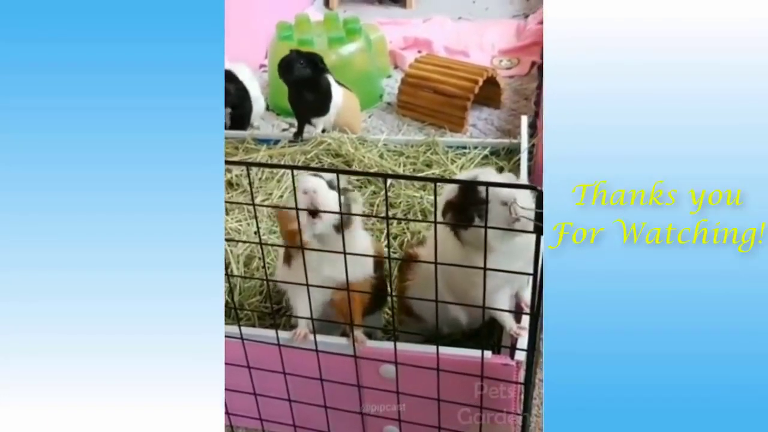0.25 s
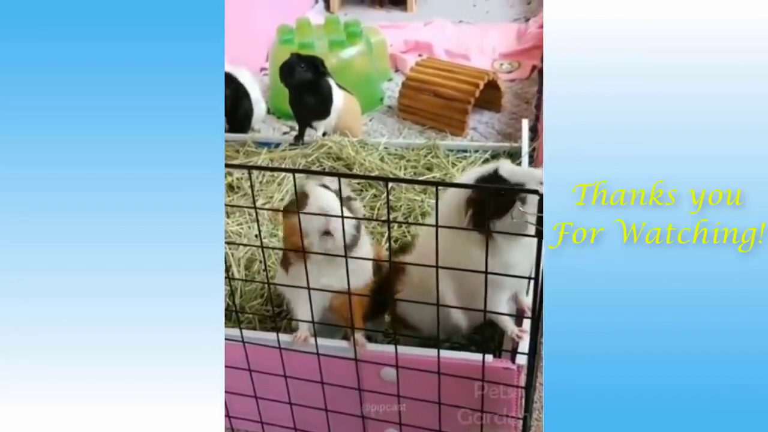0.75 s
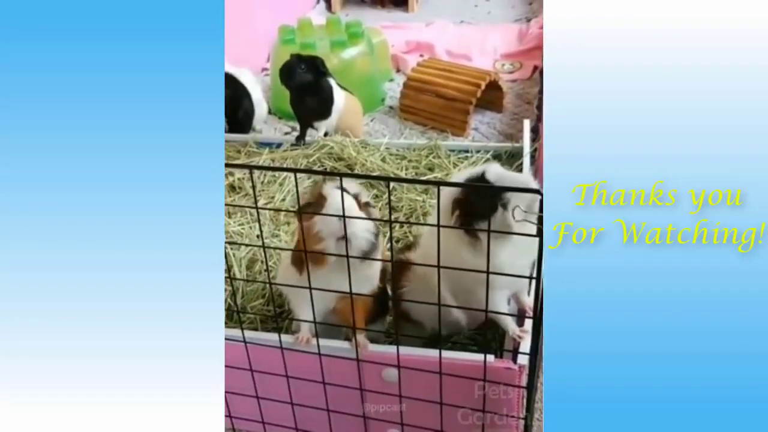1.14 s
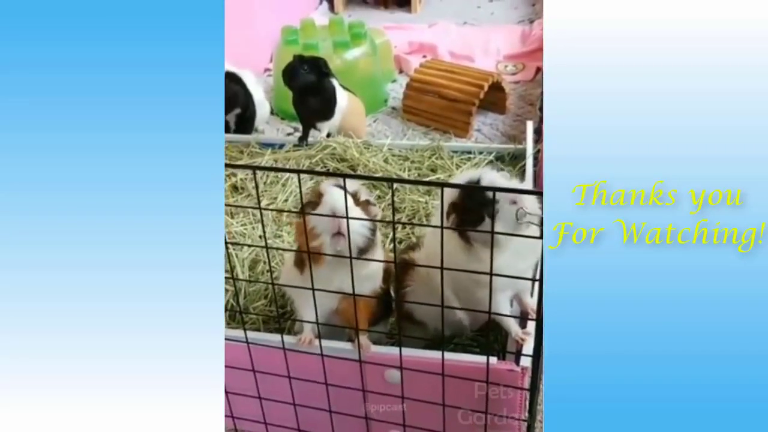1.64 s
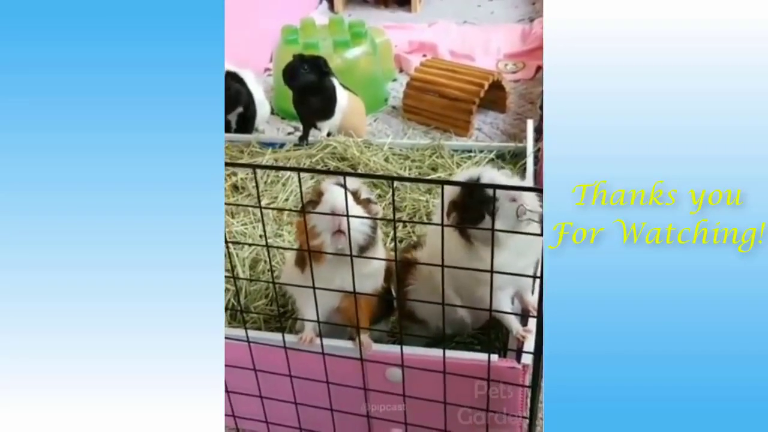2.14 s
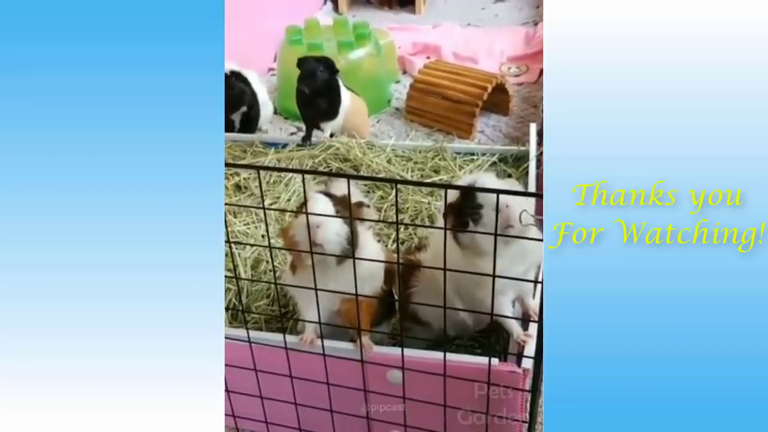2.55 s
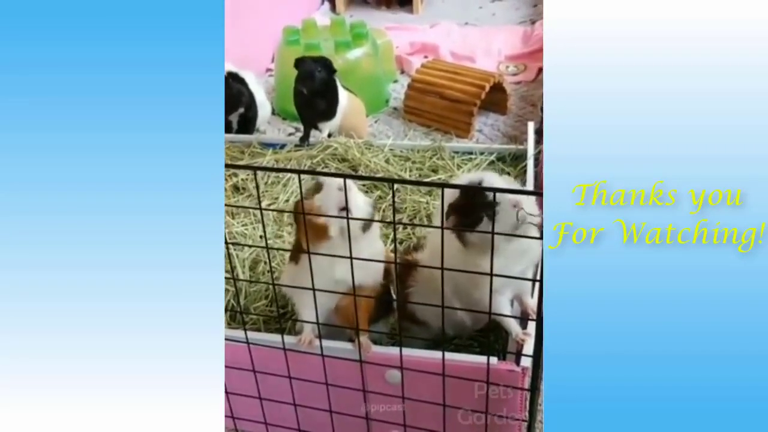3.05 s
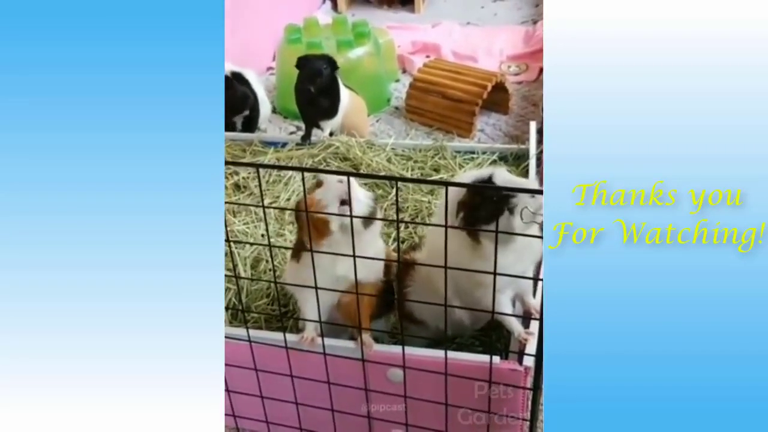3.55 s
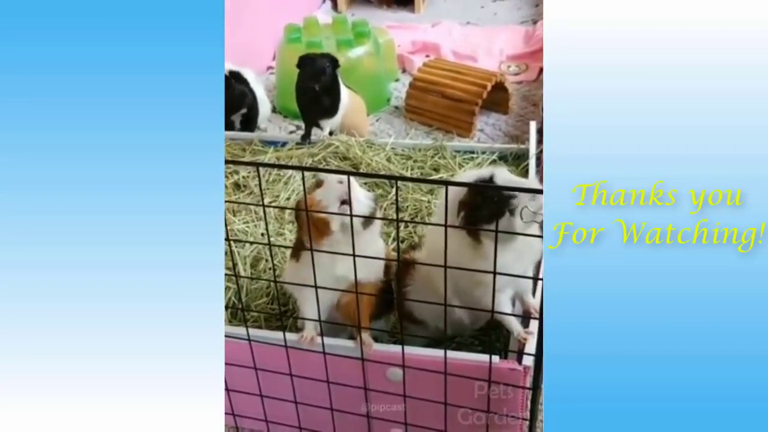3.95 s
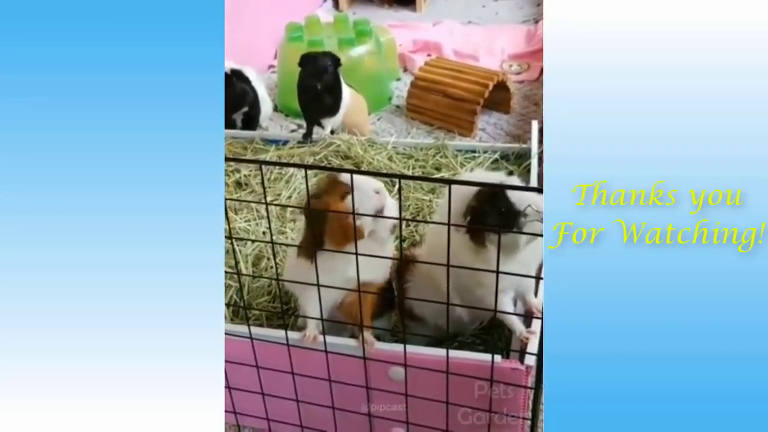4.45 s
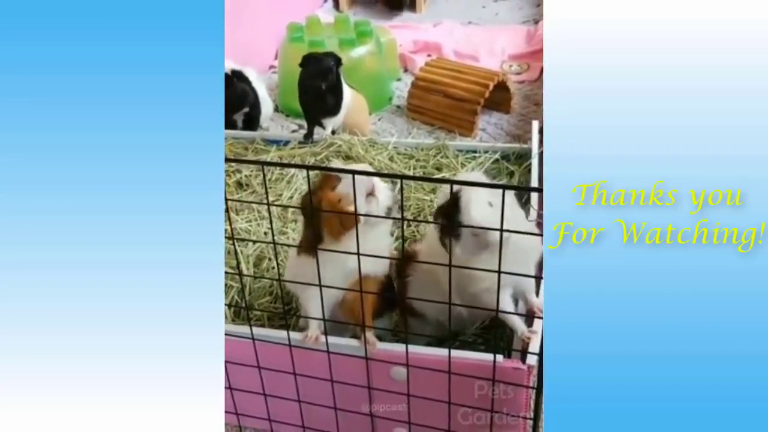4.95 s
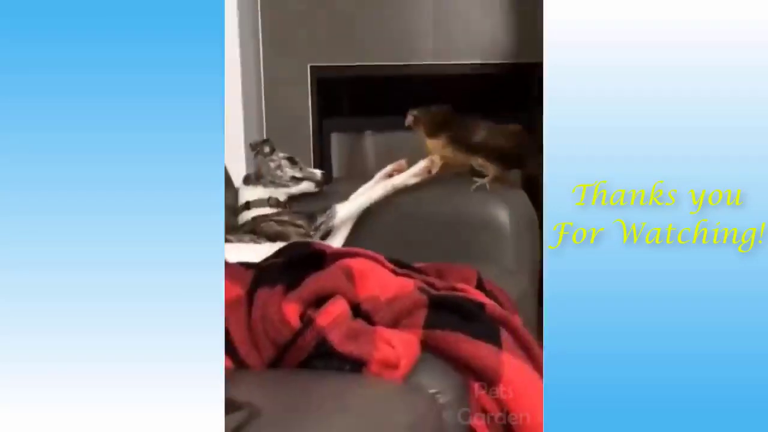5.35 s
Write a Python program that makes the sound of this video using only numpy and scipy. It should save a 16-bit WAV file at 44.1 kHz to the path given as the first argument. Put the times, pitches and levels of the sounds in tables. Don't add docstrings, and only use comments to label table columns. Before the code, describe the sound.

In a small room, paws thump a hollow plastic tray and a nearby guinea pig gives a long, loud rising squeal that cracks at its end. A shorter, quieter squeal follows, then soft upward chirps and peeps from the others. Around three seconds another long squeal climbs and roughens, with a strong tray knock near its end. Chirps continue until an abrupt stop; close microphone, low rumble and faint hay rustle.

```python
import sys
import numpy as np
from scipy import signal
from scipy.fft import rfft, irfft, next_fast_len
from scipy.io import wavfile
from scipy.ndimage import uniform_filter1d

SR = 44100
rng = np.random.default_rng(int(sys.argv[2]) if len(sys.argv) > 2 else 0)


def put_to_file(sound):
    columns = np.atleast_2d(sound).T
    safe = np.clip(columns, -1, 1)
    whole_steps = np.round(safe * 32767)
    wavfile.write(sys.argv[1], SR, whole_steps.astype(np.int16))


def rack_gain(trim_db):
    fader = np.asarray(trim_db, float)
    return 10 ** (fader / 20)


N = 246519
END_S, CUTOFF_HZ = 5.326, 14300

# [level_hz, level_db_per_hz]
RUMBLE_SPECTRUM = [(15, -55.5), (26, -21), (41, -3), (59, 14), (118, -0.5), (151, -6), (178, -20),
                   (230, -10.5), (300, -14), (390, -42), (660, -120)]
MURMUR_SPECTRUM = [(88, -48.5), (150, -2), (311, -2), (418, -10.5), (554, -8), (653, -7), (930, -5.5),
                   (1290, -8), (1600, -22), (2500, -27), (3250, -55.5), (5500, -120)]
RUSTLE_SPECTRUM = [(880, -25.5), (1500, -2.5), (1970, -7), (2360, -6), (2720, -10), (3890, -7.5),
                   (5570, -11), (7180, -12), (8200, -9), (9990, -18.5), (12300, -10.5), (13600, -9),
                   (14300, -30)]
# [time_s, level_db]
RUSTLE_LEVEL = [(0.0, -57), (0.34, -58), (0.48, -55), (0.67, -60.5), (1.04, -64), (1.38, -67), (1.57, -66.5),
                (1.98, -62), (2.52, -65), (3.07, -65.5), (3.51, -57), (3.72, -55.5), (4.0, -60), (4.08, -69.5),
                (4.3, -63.5), (4.58, -61), (4.86, -66), (5.12, -69.5)]
# [centre_s, length_s, over_rumble_db]
BOOMS = [
    (.02, 0.14, 8),
    (.45, 0.069, 16.5),
    (.7, 0.052, 8.5),
    (1.38, 0.23, 2.5),
    (1.95, .1, 4),
    (3.0, 0.086, 4.5),
    (3.5, 0.29, 9),
    (4.1, 0.3, 3),
    (4.6, 0.19, 6),
    (4.95, 0.14, 7),
]
MURMUR_DB, MURMUR_FOLLOWS = -53, .35
RUMBLE_DB, RUMBLE_FOLLOWS = -49, 0.1

# [start_s, peak_db, second_contact_db re the first, before level offsets]
KNOCKS = [(0.004, -16.5, 7), (0.211, -16.5, 3.5), (0.415, -19.5, 9), (0.634, -29.5, 8), (1.646, -27, 4.5),
          (1.883, -19.5, -1.5), (2.087, -33.5, 7), (2.306, -27.5, -4.5), (2.514, -23.5, 0),
          (2.715, -24.5, 0.5), (3.294, -34.5, -3), (3.649, -8, -4.5), (3.871, -17, 5.5)]
# [mode_hz, level_db, t60_s]
TRAY_MODES = [(246.8, -3.5, 0.079), (328.5, -0.5, 0.11), (416.6, 1, 0.05), (530, -0.5, .03),
              (672, -7.5, 0.062), (728, -0.5, .035), (900, -20.5, 0.021), (1150, -9, 0.03),
              (1500, -11, 0.024)]

# [start_s, length_s, from_hz, to_hz,
# level_db]
THIN_GLIDES = [(1.749, 0.083, 1420, 1740, -57.5), (1.844, 0.039, 2462, 2170, -48),
               (1.885, 0.04, 2275, 2550, -49.5), (2.449, 0.072, 717, 1604, -56.5), (2.778, 0.049, 833, 1440, -53),
               (2.82, 0.04, 1425, 1760, -65), (3.935, 0.0495, 1055, 1334, -48.5), (3.981, 0.039, 1880, 4670, -57),
               (4.738, 0.053, 1104, 1880, -58), (5.012, 0.035, 1370, 1310, -50.5),
               (5.275, 0.036, 912, 1082, -44.5),
               (.004, 0.095, 2770, 2785, -53), (0.09, 0.047, 2760, 3000, -51.5), (0.545, 0.08, 988, 1106, -56),
            (.8, 0.086, 4401, 4568, -57), (.8, .06, 1353, 1895, -58), (1.028, 0.058, 575, 535, -56.5),
            (1.2, .04, 2320, 2580, -55), (2.477, 0.028, 1910, 2700, -65), (2.635, 0.027, 2150, 2570, -62.5),
            (2.78, .025, 2040, 2800, -65), (3.562, .06, 892, 1380, -55.5), (3.75, 0.028, 3500, 3510, -62),
            (4.273, .08, 1150, 1950, -54), (4.72, 0.025, 1120, 1005, -53), (4.99, .03, 1077, 1120, -73)]
# [time_s, pitch_hz, level_db]
LONG_WHISTLE = [(1.24, 2279, -54), (1.3, 2500, -55), (1.312, 2605, -50), (1.37, 2920, -56),
                (1.419, 2945, -52), (1.492, 3395, -57), (1.505, 3877, -80), (1.529, 3970, -51.5),
                (1.545, 4033, -87)]
WARBLE = [
    (4.047, 656, -48),
    (4.078, 1136, -52.5),
    (4.12, 1487, -58),
    (4.153, 1147, -54),
    (4.166, 1095, -57),
    (4.243, 1193, -54),
]
WARBLE_OCTAVE_DB = -11
GLIDE_BEND, GLIDE_EDGE_DB, GLIDE_OCTAVE_DB = .55, -1.5, -21

# [time_s, pitch_hz before breaks, effort_db, fold_pressing_db, mouth_opening_db]
FIRST_SQUEAL = [(.025, 769, -39, -12, -26.5), (.056, 1231, -35.5, -20, -21), (.17, 1342, -39.5, -9, -6),
                (.305, 1659, -36, -8.5, -0.5), (.355, 2030, -27.5, -10.5, -9.5),
                (.448, 2351, -18, -12.5, -8), (.486, 2592, -16.5, -2.5, 0.5), (.578, 3048, -22.5, -5, 8),
                (.661, 3170, -20.5, -4, -8)]
SECOND_SQUEAL = [(.81, 608, -58, 0, -3.5), (.85, 547, -48.5, 3, -15), (.93, 995, -38, -13, -28),
                 (.97, 1052, -39.5, -21, -14.5), (1.004, 1224, -43, -4.5, -4), (1.068, 1247, -45, 2, -4),
                 (1.124, 1387, -38, -0.5, -3), (1.176, 1658, -36.5, -6.5, -1.5),
                 (1.212, 1726, -35, -16.5, -24)]
THIRD_SQUEAL = [(3.075, 560, -49, -5.5, -20.5), (3.145, 1053, -31, -34.5, -52),
                (3.27, 1272, -34.5, -18, -14), (3.345, 1655, -35.5, -13, -7.5),
                (3.406, 2003, -28, -15, -14.5), (3.49, 2276, -24.5, -12.5, -23),
                (3.53, 2397, -17, -10.5, -24.5), (3.712, 3212, -23, -15.5, -23.5),
                (3.745, 3190, -37, -14, -25)]
# [time_s, pitch_hz, harmonic_1_db, harmonic_2_db, harmonic_3_db]
FLICK = [
    (.664, 4100, -32, -30, -40),
    (.667, 4550, -28, -28, -34),
    (.67, 4700, -36, -36, -42),
]
# [time_s, jump_hz]
BREAKS = [
    (0.448, 219.5),
    (0.488, 169.3),
    (1.188, 213),
    (3.503, 301),
    (3.72, 331),
]
BREAK_S = 0.0052
# [overtone_hz, level_db]
THROAT = [(2000, -6), (3500, -40), (4500, -3), (5400, -31), (6300, 1.5), (7200, -11), (8300, -5),
          (9300, -17), (10300, -26), (11500, -22), (12500, -18.5), (13400, -2), (13900, 2), (14050, -49)]
SOFT_THROAT = [(1200, 3), (2000, -6), (2800, 4), (4500, 1)]
# [harmonic_hz, level_db]
MOUTH = [(600, -4), (1400, -7), (2350, 2.86), (3150, -13.5), (3550, -7), (4500, -8.5), (6200, 5),
         (10000, -5.2)]
THIRD_DB, THIRD_PRESS, THIRD_OPEN = -7, 0.71, 0.34
HALF_S, HALF_LENGTH_S, HALF_DB, HALF_HIGH_DB = 3.6, .075, -50, -41

# [rise_start_s, rise_s, top_hz, hold_s, level_db]
HOOKED_CHIRPS = [(1.104, 0.029, 852, 0.0044, -55), (1.369, 0.058, 1048, 0.0063, -44),
                 (1.643, 0.053, 1005, 0.16, -44.5), (4.634, .065, 1175, 0.0024, -41.5),
                 (4.888, .088, 1055, 0.0071, -40), (5.194, .038, 870, 0.045, -41.5)]
# [start_s, rise_s, top_hz, hold_s, level_db]
PLAIN_CHIRPS = [(1.812, 0.031, 1036, 0.0027, -53), (2.117, 0.03, 939, 0.2, -47),
                (2.578, 0.052, 1042, 0.011, -45.5), (2.837, 0.041, 905, .005, -50.5),
                (3.967, .046, 1720, 0.0025, -46), (4.249, 0.04, 891, 0.17, -41)]
LOW_HZ, DIP_FROM_HZ, DIP_S, REST_S = 628.3, 820, .025, .03
# [start_db, bottom_db]
DIP_DB = (-4.5, -10)
CLIMB_HZ_PER_S, FLICK_S = 1100, 0.024
START_DB, TOP_DB, HELD_DB, END_DB = -3.5, 0, .1, -13.5
OCTAVE_DB, OCTAVE_FALL_DB = -10.5, -20
EAGER_FLICK, CALM_FLICK, CALM_FROM_S = 0.268, 0.052, 3

ROOM_T60_S, ROOM_DB, TRAY_ROOM_DB = 0.27, -15, -21
MASK_DB, MASK_FALL_DB, MASK_FLOOR_DB, MASK_TILT_DB = -26, -0.5, -25, 3.5


def rms_one(x):
    return x / np.sqrt(np.mean(x ** 2) + 1e-20)


def at_hz(points, hz):
    curve_hz, level_db = np.transpose(points)
    return np.interp(np.log(hz), np.log(curve_hz), level_db)


def drift(rate_hz, size):
    r = np.exp(-2 * np.pi * rate_hz / SR)
    noise = rng.standard_normal(size + 3000)
    return rms_one(signal.lfilter([1], [1, -2 * r, r * r], noise)[3000:])


def coloured(spectrum, patchy_db, flicker):
    size = next_fast_len(N)
    hz = np.arange(size // 2 + 1) * SR / size + 1
    octave = np.log2(hz)
    white = rfft(rng.standard_normal(size)) * rack_gain(at_hz(spectrum, hz))
    coarse = N // 16 + 1
    together = drift(16 * flicker / 3, coarse)
    out = 0
    for centre in np.arange(np.log2(spectrum[0][0]), np.log2(spectrum[-1][0]) + .5, .5):
        part = irfft(white * np.clip(1 - 2 * abs(octave - centre), 0, 1), size)[:N]
        gain = rack_gain(patchy_db * (.7 * together + drift(16 * flicker, coarse)))
        out = out + part * np.interp(np.arange(N) / 16, np.arange(coarse), gain)
    return rms_one(out)


def house_and_hay():
    t = np.arange(N) / SR
    rustle_db = np.interp(t, *np.transpose(RUSTLE_LEVEL))
    swing_db = rustle_db - rustle_db.mean()
    boom_db = sum(db * np.exp(-((t - s) / length) ** 2) for s, length, db in BOOMS)
    rumble_db = RUMBLE_DB + RUMBLE_FOLLOWS * swing_db + boom_db
    murmur_db = MURMUR_DB + MURMUR_FOLLOWS * swing_db
    rumble = rack_gain(rumble_db) * coloured(RUMBLE_SPECTRUM, patchy_db=3.0, flicker=10)
    murmur = rack_gain(murmur_db) * coloured(MURMUR_SPECTRUM, patchy_db=3.5, flicker=18)
    rustle = rack_gain(rustle_db + 7) * coloured(RUSTLE_SPECTRUM, patchy_db=1.96, flicker=25)
    return rumble + murmur + rustle


def ring(clicks, hz, t60):
    r, w = rack_gain(-60 / (t60 * SR)), 2 * np.pi * hz / SR
    return signal.lfilter([0, np.sin(w)], [1, -2 * r * np.cos(w), r * r], clicks + 1e-18)


def knocks():
    s, first_db, second_db = np.transpose(KNOCKS)
    chance_db = 2.5 * rng.normal(0, 1, (len(s), 2 * len(TRAY_MODES)))
    out = 0
    for k, (hz, level_db, t60) in enumerate(TRAY_MODES):
        at = ((s + 0.00708 * (240 / hz) ** 2) * SR).astype(int)
        clicks = np.zeros(N)
        clicks[at] = rack_gain(first_db + level_db - 11.5 + chance_db[:, 2 * k])
        later_db = second_db - 3 * np.log2(hz / 300) + chance_db[:, 2 * k + 1]
        clicks[at + int(.008 * SR)] = rack_gain(first_db + level_db - 15.0 + later_db)
        out = out + ring(clicks, hz, t60) * (-1) ** k
    return signal.sosfilt(signal.butter(3, 1300, fs=SR, output="sos"), out)


def call(rows, throat, waver, flutter_db, fall_db, breath_db):
    s, pitch, *levels = np.transpose(rows)
    s = np.maximum.accumulate(s)
    t = np.arange(max(s[0] - .005, 0) * SR, (s[-1] + 0.0038) * SR).astype(int) / SR
    gate = np.clip(np.minimum((t - t[0]) / 0.0011, (t[-1] - t) / 0.0038), 0, 1) ** 2
    hz = np.interp(t, s, pitch) * (1 + waver * drift(70, len(t)) + .004 * drift(22, len(t)))
    phase = 2 * np.pi * np.cumsum(hz) / SR
    levels = [uniform_filter1d(np.interp(t, s, c), size=250) for c in levels]
    top, voice = len(levels), 0
    for k in range(1, int(CUTOFF_HZ / hz.min()) + 1):
        db = levels[min(k, top) - 1] + flutter_db * k ** 0.2 * drift(54, len(t))
        if k >= top:
            db = db + at_hz(throat, k * hz) + fall_db * np.log2(k / top)
        audible = k * hz < SR / 2.2
        voice = voice + np.sqrt(2) * rack_gain(db) * audible * np.sin(k * phase + rng.uniform(0, 7))
    air = signal.lfilter([1, -.8], [1], rng.standard_normal(len(t))) * (1 + np.cos(phase))
    effort = np.sqrt(uniform_filter1d(voice ** 2, size=400) + 1e-18)
    out, at = np.zeros(N), round(t[0] * SR)
    out[at:at + len(t)] = gate * (voice + rack_gain(breath_db) * effort * air)
    return out


def glide(s, length, from_hz, to_hz, db):
    middle_hz = from_hz + GLIDE_BEND * (to_hz - from_hz)
    return [(s, from_hz, db + GLIDE_EDGE_DB), (s + length / 2, middle_hz, db),
            (s + length, to_hz, db + GLIDE_EDGE_DB)]


def thin_calls():
    thin = [(glide(*row), GLIDE_OCTAVE_DB) for row in THIN_GLIDES]
    thin += [(LONG_WHISTLE, GLIDE_OCTAVE_DB), (WARBLE, WARBLE_OCTAVE_DB)]
    out = 0
    for rows, octave_db in thin:
        rows = [(s, hz, db, db + octave_db) for s, hz, db in rows]
        out = out + call(rows, SOFT_THROAT, waver=0.023, flutter_db=3.0, fall_db=-14, breath_db=-32.0)
    return out


def squeal(rows):
    s, *columns = np.transpose(rows)
    t = np.arange(s[0], s[-1], .002)
    hz, effort_db, press_db, open_db = [np.interp(t, s, c) for c in columns]
    hz = hz + sum(jump * np.clip(.5 + (t - at) / (2 * BREAK_S), 0, 1) for at, jump in BREAKS if at > s[0])
    first_db = at_hz(MOUTH, hz)
    second_db = press_db + at_hz(MOUTH, 2 * hz)
    third_db = THIRD_DB + THIRD_PRESS * press_db + THIRD_OPEN * open_db + at_hz(MOUTH, 3 * hz)
    levels = effort_db + np.array([first_db, second_db, third_db, open_db])
    return np.transpose([t, hz, *levels])


def half_lines(rows):
    return [(s, hz / 2, -90, -90, HALF_DB, HALF_HIGH_DB)
            for s, hz, *_ in rows if 0 < s - HALF_S < HALF_LENGTH_S]


def squeals():
    third = squeal(THIRD_SQUEAL)
    out = call(squeal(FIRST_SQUEAL), THROAT, waver=.002, flutter_db=3.0, fall_db=-0.5, breath_db=-43.0)
    out += call(FLICK, SOFT_THROAT, waver=.05, flutter_db=4, fall_db=-3, breath_db=-10)
    out += call(squeal(SECOND_SQUEAL), THROAT, waver=0.0037, flutter_db=3, fall_db=1.0, breath_db=-32)
    out += call(third, THROAT, waver=.011, flutter_db=2.8, fall_db=-2.5, breath_db=-37)
    out += call(half_lines(third), THROAT, waver=.005, flutter_db=-5.5, fall_db=-5, breath_db=-38)
    return out


def chirp(s, rise, hz, hold, db, hooked):
    flick = EAGER_FLICK if s < CALM_FROM_S else CALM_FLICK
    last = hz + CLIMB_HZ_PER_S * hold
    rows = [(s, LOW_HZ, START_DB), (s + rise, hz, TOP_DB), (s + rise + hold, last, HELD_DB),
            (s + rise + hold + FLICK_S, last * (1 + flick), END_DB)]
    if hooked:
        rows = [(s - REST_S - DIP_S, DIP_FROM_HZ, DIP_DB[0]), (s - REST_S, LOW_HZ, DIP_DB[1])] + rows
    return [(t, f, db + d, db + d + OCTAVE_DB + OCTAVE_FALL_DB * np.log2(f / LOW_HZ)) for t, f, d in rows]


def chirps():
    rows = [chirp(*row, True) for row in HOOKED_CHIRPS] + [chirp(*row, False) for row in PLAIN_CHIRPS]
    return sum(call(r, SOFT_THROAT, waver=0.012, flutter_db=1.5, fall_db=-22, breath_db=-36) for r in rows)


def room(x):
    t = np.arange(int(.6 * SR)) / SR
    noise = rng.standard_normal(len(t)) * (t > .003)
    dull = signal.lfilter([.3], [1, -.7], noise)
    bright = 0.09 * (noise - dull)
    tail = dull * rack_gain(-60 * t / ROOM_T60_S) + bright * rack_gain(-60 * t / (0.58 * ROOM_T60_S))
    return signal.fftconvolve(x, tail / np.sqrt(np.sum(tail ** 2)))[:N]


def scene():
    paws = knocks()
    voices = thin_calls() + squeals() + chirps()
    reflections = room(rack_gain(ROOM_DB) * voices + rack_gain(TRAY_ROOM_DB) * paws)
    return (voices + paws + reflections + house_and_hay())[None]


def masked(x):
    z = signal.stft(x, nperseg=1024, noverlap=768)[2]
    bands = uniform_filter1d(uniform_filter1d(abs(z) ** 2, size=9, axis=1), size=3, axis=2)
    pole = rack_gain(2 * min(MASK_FALL_DB, -.05))
    shadow = signal.lfilter([1 - pole], [1, -pole], bands, axis=1)
    margin_db = 10 * np.log10(bands / (shadow + 1e-20) + 1e-20) - MASK_DB
    margin_db = margin_db - MASK_TILT_DB * np.log2(np.arange(1, 514) / 110)[:, None]
    keep = rack_gain(MASK_FLOOR_DB * np.clip(.5 - margin_db / 2, 0, 1))
    return signal.istft(z * keep, nperseg=1024, noverlap=768)[1][:, :N]


def band_limit(x):
    return signal.sosfilt(signal.butter(12, 15030, fs=SR, output="sos"), x)


def record(dry):
    cut = signal.sosfilt(signal.cheby2(14, 70, CUTOFF_HZ * 1.015, fs=SR, output="sos"), dry)
    stop = np.clip((END_S - np.arange(N) / SR) / 0.0036, 0, 1)
    return band_limit(masked(cut) * stop)


dry = scene()
out = record(dry)
put_to_file(out)
```